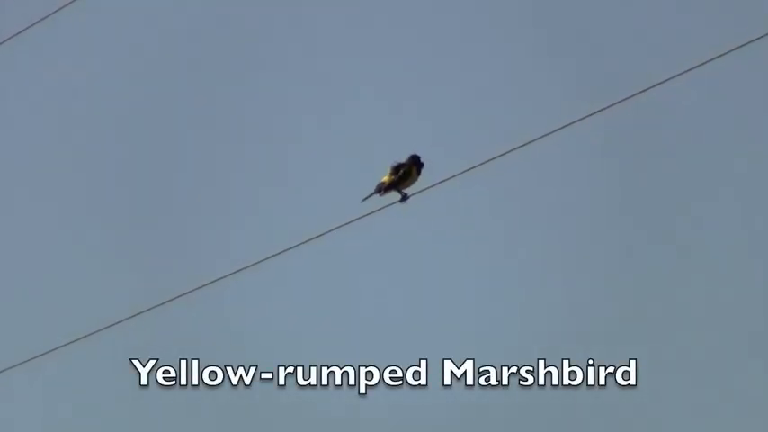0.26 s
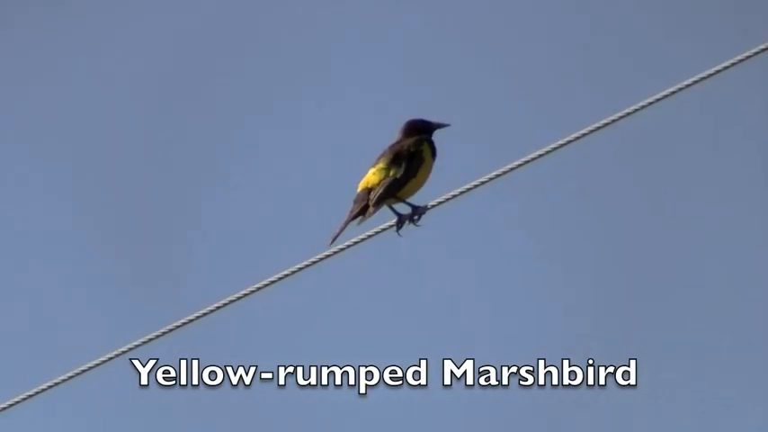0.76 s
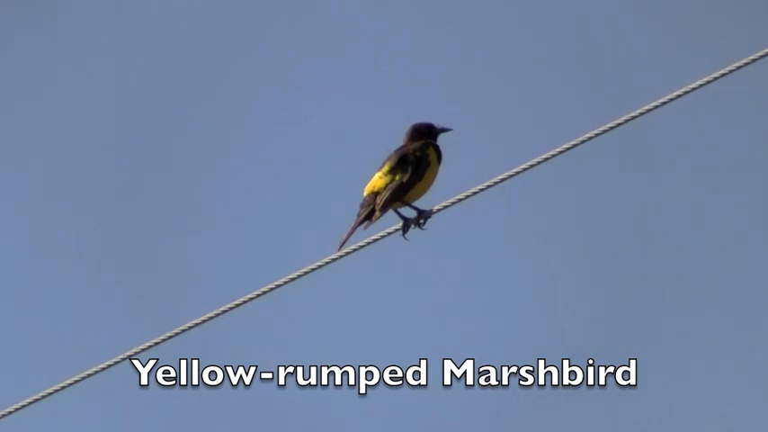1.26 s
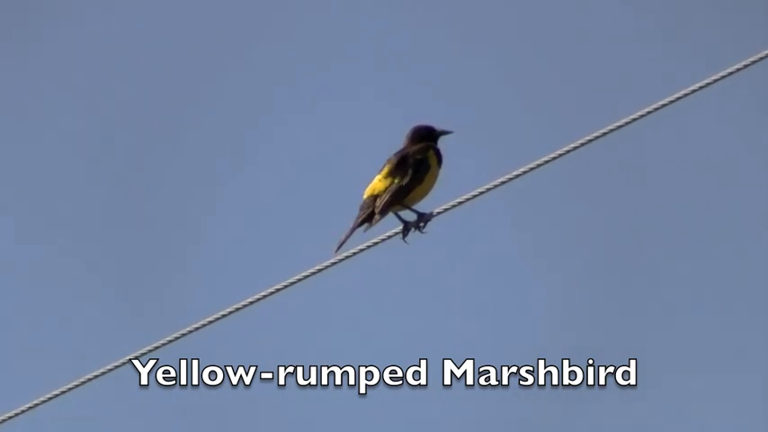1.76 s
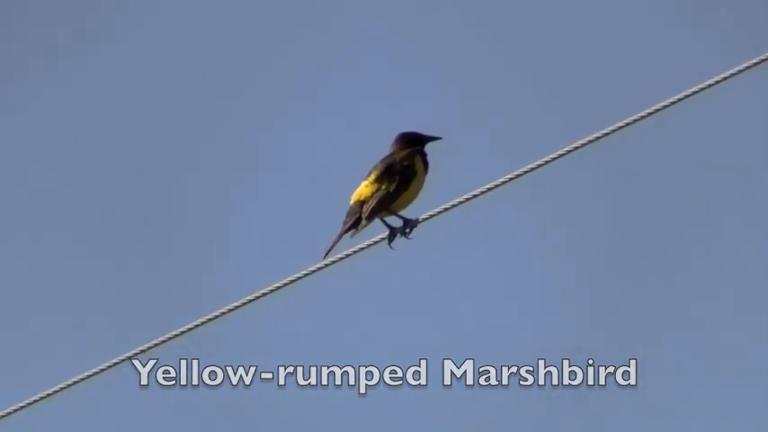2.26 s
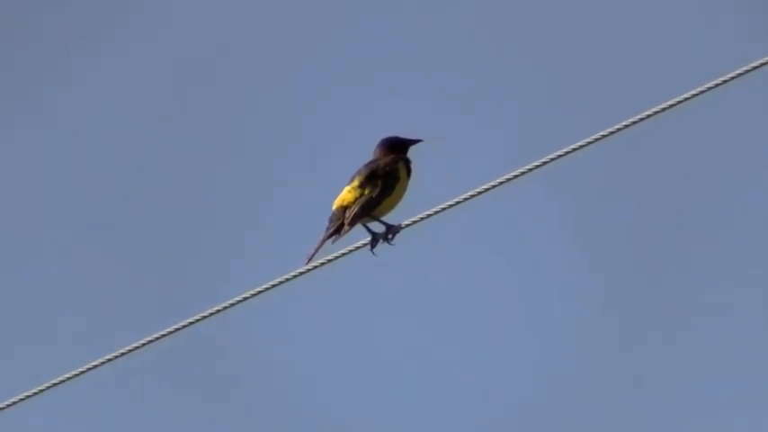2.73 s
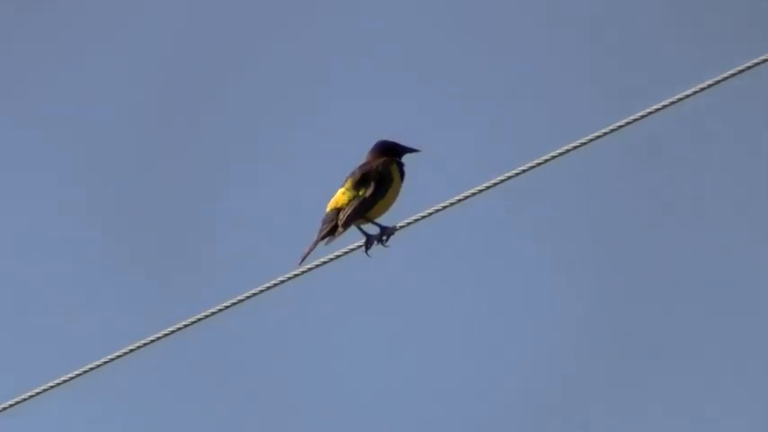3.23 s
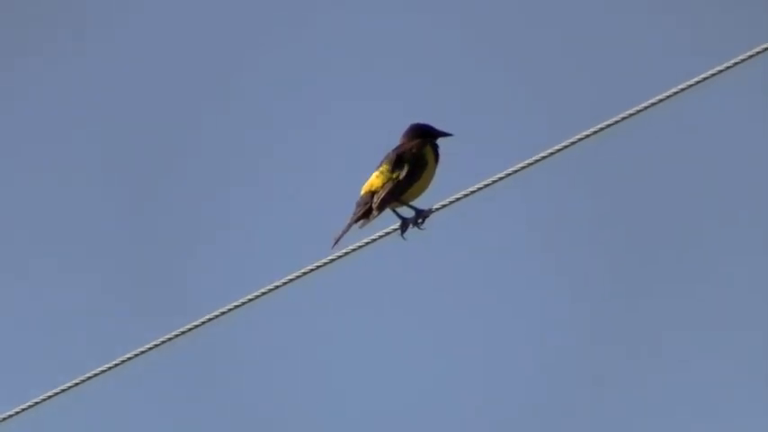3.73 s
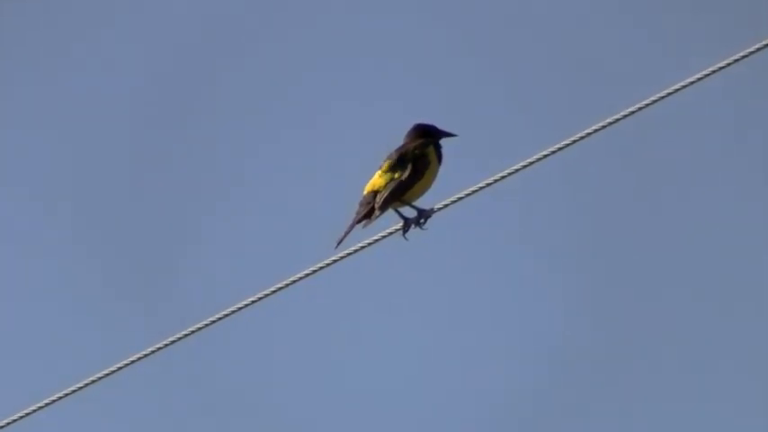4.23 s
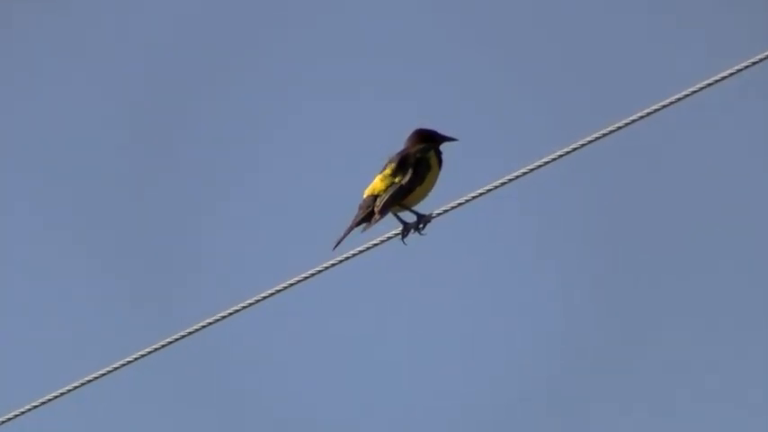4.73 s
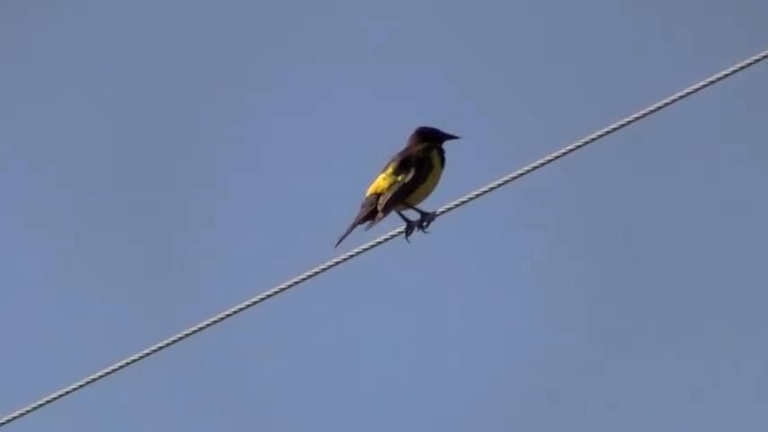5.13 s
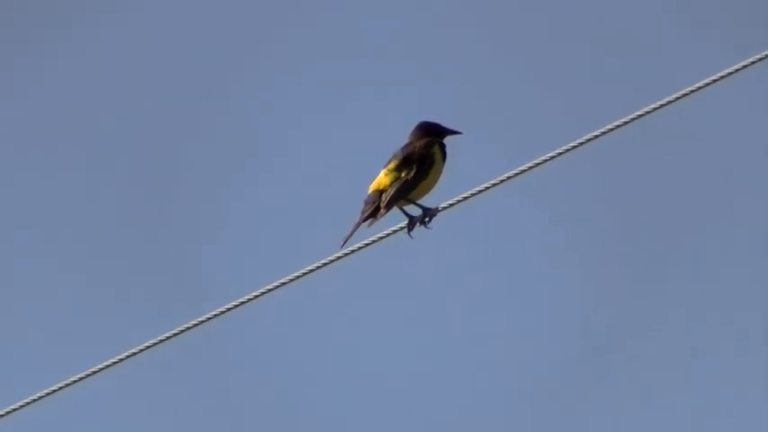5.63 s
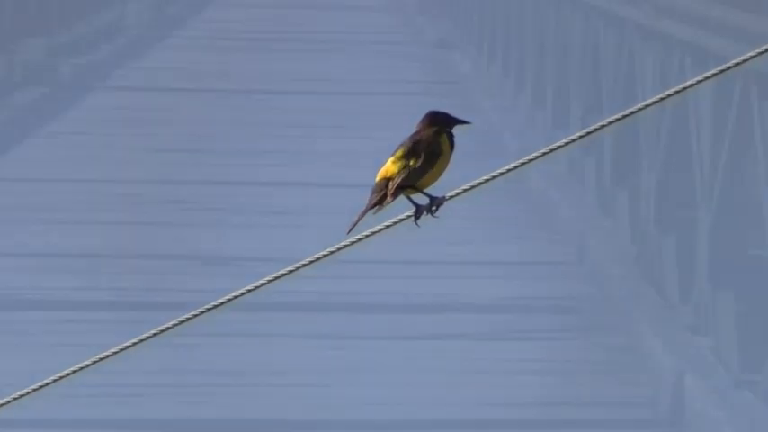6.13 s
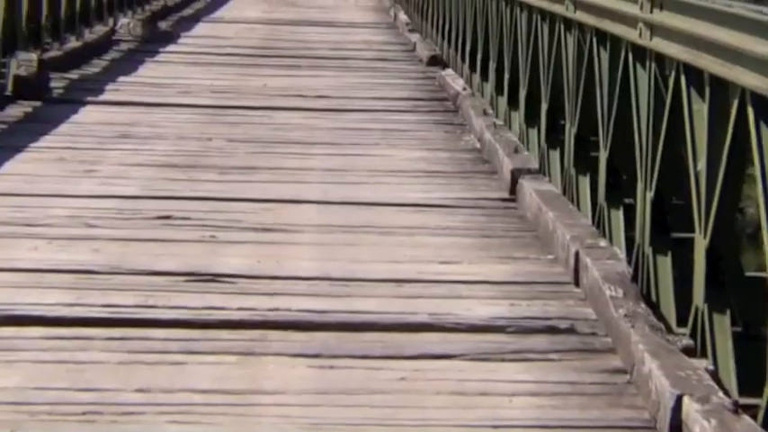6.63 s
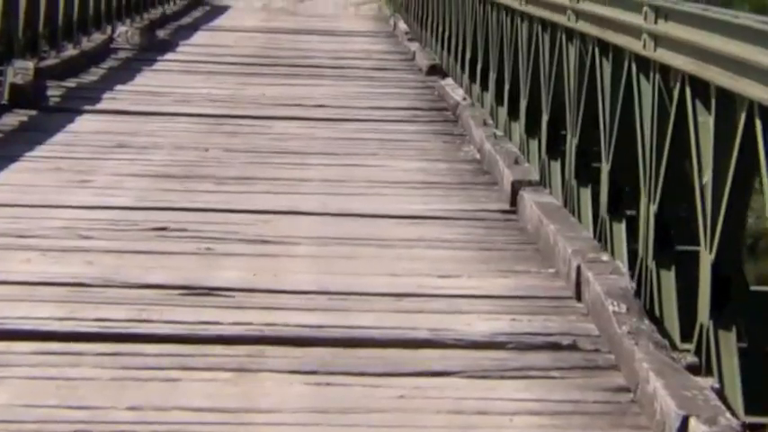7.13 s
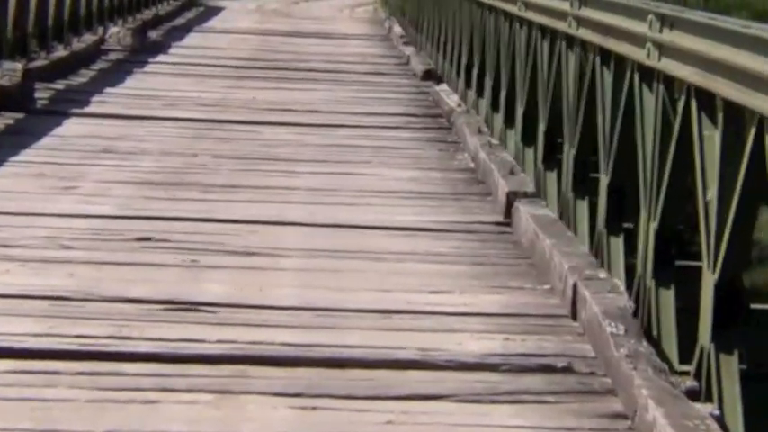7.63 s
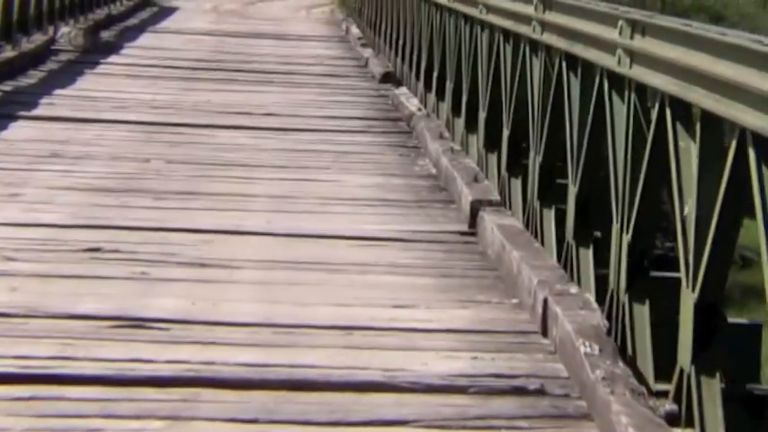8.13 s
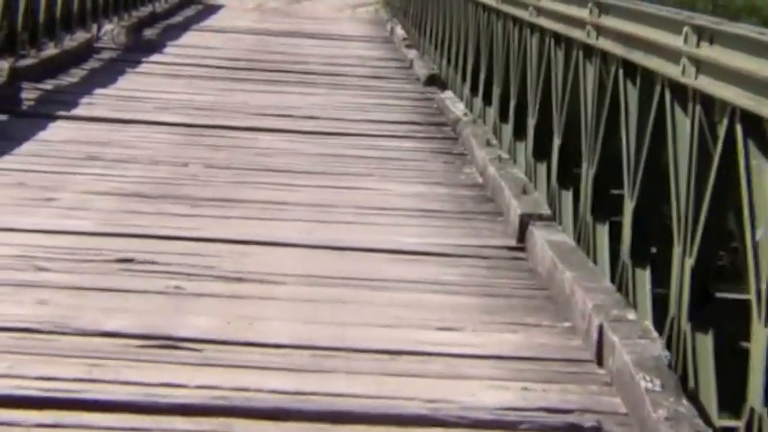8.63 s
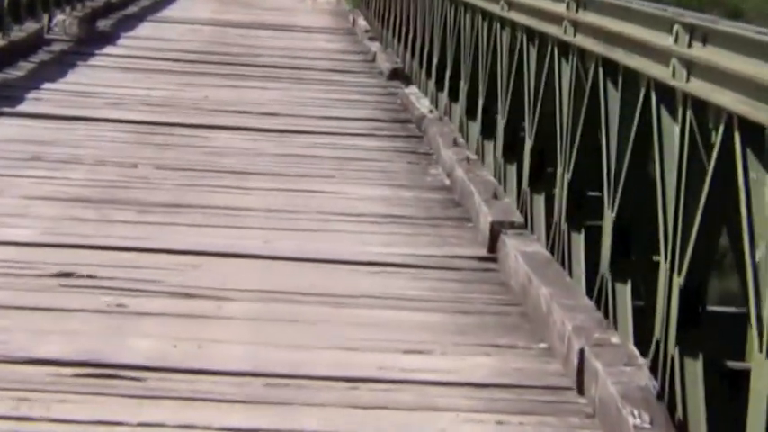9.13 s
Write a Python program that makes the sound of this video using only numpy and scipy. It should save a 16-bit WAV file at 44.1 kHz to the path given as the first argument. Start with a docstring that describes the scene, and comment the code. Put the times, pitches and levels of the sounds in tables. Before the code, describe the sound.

In a quiet marsh, small birds give short chirps and thin whistles over two crickets and a high insect buzz. A light breeze buffets the microphone, with a few soft rustles and dry ticks nearby. After about six seconds the sound switches to a much louder vehicle creeping over a plank bridge close by: the engine hums, the deck rumbles, loose boards knock ever more densely and steelwork rattles.

```python
"""A vehicle creeps over a plank bridge on a steel truss, close to the microphone: the engine hums, the
deck rumbles, loose boards knock under the tyres ever more densely, and the steelwork rattles.
It comes in at about six seconds, when the scene changes. Before that we are in a quiet marsh: small
birds call, two crickets and a katydid sing with their wings, something rustles close by, and a light
breeze buffets the microphone."""
import sys
import numpy as np
from scipy import signal
from scipy.fft import rfft, irfft, next_fast_len
from scipy.io import wavfile
from scipy.ndimage import map_coordinates

SR = 44100
rng = np.random.default_rng(int(sys.argv[2]) if len(sys.argv) > 2 else 0)


def log_audio(samples):
    """Write samples as a 16-bit WAV file to the path given in sys.argv[1]."""
    # one column per channel
    frames = np.atleast_2d(samples).T
    # limit to full scale, then quantise
    limited = np.clip(frames, -1, 1)
    pcm = np.round(limited * 32767).astype(np.int16)
    wavfile.write(sys.argv[1], SR, pcm)


N = 413216

# Modes of a board on its bearers. Each row: frequency in Hz, level in dB, t60 in seconds.
BOARD_MODES = [(202.4, -6, 0.12), (295.2, -1.5, 0.1), (358.5, -3, 0.062), (480.5, -1.5, 0.079),
               (645.7, -2.5, 0.076), (778, -2, 0.023), (1056, -1.5, 0.03), (1222, -8.5, 0.046),
               (1560, -24, 0.016), (2060, -16, 0.042), (2750, -17, .015), (3700, -21, .012)]
# Wheels dropping between boards. Each row: start in seconds, level in dB, pitch in Hz.
WHEEL_DROPS = [(6.372, -15, 95), (6.898, -24, 101), (7.178, -12.5, 75), (7.533, -10, 88), (7.745, -10, 62),
               (8.052, -8, 103), (8.117, -3, 63.6), (8.252, -18, 70), (8.684, -11.5, 107)]
# Fader on the marsh, with one brief dip early on. Each row: time in seconds, gain from 0 to 1.
MARSH_FADER = [(0, 0.84), (.58, 0.83), (.675, 0), (.77, 1), (6.19, 0.78), (6.35, 0)]


def bridge():
    """The vehicle draws nearer: engine, tyre noise and everything that it shakes."""
    # The approach. Each row: time in seconds, deck rumble and board clatter in dB before their trims.
    approach = [(6.5, -28, -30), (6.96, -31, -31), (8.1, -20, -25.5), (8.72, -23, -22),
                (9.02, -24.5, -12.5), (9.37, -29.5, -17.5)]
    # Spectrum of engine and tyre noise. Each row: frequency in Hz, relative level in dB.
    running_spectrum = [(76, -48), (130, 2), (198, -6.5), (268, -3.5), (297, -7), (393, -11), (651, -13),
                        (764, -13), (1050, -12.5), (1520, -17), (2010, -16), (2360, -22), (6200, -33.5),
                        (8390, -40.5), (16000, -97)]
    rumble_db, clatter_db = in_time(approach)
    rumble = deck_rumble(rumble_db + 2)
    running = from_db(-25 + 0.21 * drift(13)) * coloured(rng.standard_normal(N), running_spectrum)
    boards = from_db(clatter_db - 3) * board_clatter() + board_knocks()
    return engine() + running + rumble + boards + wheel_thumps() + steel_rattles()


def board_knocks(rebound_s=0.00458, settle_s=0.01, bounce_db=-9, deck_db=-13, deck_t60=0.3):
    """Each loose board cracks on its bearer, rebounds, settles and rings; the blow spreads in the deck."""
    # Boards struck by a tyre. Each row: start in seconds, level in dB, brightness in Hz, pitch ratio.
    loose_boards = [(7.4425, -8.5, 870, 1.06), (7.825, -13.5, 378, 0.76), (7.987, -16.5, 1500, 1.12),
                    (8.031, -12.5, 605, 0.89), (8.072, -11, 260, 0.73), (8.3485, -12, 750, 0.97),
                    (8.369, -13, 1200, 1.06), (8.415, -13, 990, 1.15), (8.759, -15, 400, 0.97),
                    (8.7892, -5, 1670, 1.015), (9.009, -13.5, 1100, 0.88), (9.054, -15, 500, 1),
                    (9.1014, -5.5, 1900, 0.87), (9.128, -10.5, 320, .9), (9.1573, -4, 3800, 1),
                    (9.284, -7, 383, 0.84), (9.346, -10.5, 600, 0.84)]
    out, t = np.zeros(N), np.arange(SR // 3) / SR
    for s, db, contact_hz, pitch in loose_boards:
        touches = 1. * (t == 0)
        add(touches, rebound_s * rng.uniform(0.72, 1.6), from_db([bounce_db]))
        add(touches, settle_s * rng.uniform(0.757, 1.6), from_db([bounce_db]))
        blow = low_pass(touches, contact_hz)
        uneven_db = rng.normal(0, 1.5, len(BOARD_MODES))
        # neighbouring modes move the surface in opposite directions
        board = sum((-1) ** k * from_db(level + uneven_db[k]) * ring(blow, hz * pitch, t60)
                    for k, (hz, level, t60) in enumerate(BOARD_MODES))
        deck = signal.fftconvolve(board, scatter(t, deck_t60))[:len(t)]
        # hard contacts also set the stiff grain of the wood snapping
        crack = ring(blow, hz=1700, t60=0.0045) + from_db(-3) * ring(blow, hz=3400, t60=0.0045)
        add(out, s, from_db(db) * (board + crack + from_db(deck_db) * deck))
    return out


def board_clatter(contact_hz=700):
    """Many lighter boards, long and short, chatter on their bearers."""
    out = 0
    for pitch in (.87, 1.0, 1.13):
        blows = low_pass(contacts(per_s=260, spread_db=1.5), contact_hz)
        out += sum((-1) ** k * from_db(db) * ring(blows, hz * pitch, t60)
                   for k, (hz, db, t60) in enumerate(BOARD_MODES))
    return rms_one(out)


def wheel_thumps(t60=0.14, tyre_hz=600):
    """A wheel drops, the tyre cushions it and the suspension booms for a few cycles."""
    out, t = np.zeros(N), np.arange(SR // 3) / SR
    for s, db, hz in WHEEL_DROPS:
        add(out, s, from_db(db) * np.sin(2 * np.pi * hz * t) * dying(t, t60))
    return low_pass(out, tyre_hz)


def deck_rumble(rolling_db, heave_db=-9, heave_t60=0.27):
    """The deck rumbles under the rolling wheels and heaves on after each drop."""
    # Spectrum of the deck. Each row: frequency in Hz, relative level in dB.
    deck_spectrum = [(12, -38), (20, -10), (49, 3), (69, 4), (102, 4), (204, -10), (270, -5), (330, -14.5),
                     (430, -15), (730, -120)]
    heave, t = np.zeros(N), np.arange(SR) / SR
    for s, db, _ in WHEEL_DROPS:
        add(heave, s, from_db(db + heave_db) * dying(t, heave_t60))
    rumble = coloured(contacts(per_s=260, spread_db=1.5), deck_spectrum)
    return np.hypot(from_db(rolling_db), heave) * rumble


def steel_rattles(rise_s=0.0028, truss_db=16, panels_db=-24):
    """Loose steel parts buzz against each other in short bursts that ring the truss and its panels."""
    # Shaken steelwork. Each row: start in seconds, level in dB, t60 in seconds, brightness in Hz.
    bursts = [(8.862, -20, 0.27, 8350), (8.922, -25, 0.54, 4450), (9.007, -24.5, 0.31, 7040),
              (9.174, -22.5, 0.18, 4050), (9.305, -25.5, 0.2, 6500), (9.322, -22.5, 0.37, 2620)]
    # Resonances of the truss. Each row: centre in Hz, width in Hz, relative level in dB.
    truss_bands = [(997, 204, 10), (1300, 500, 5), (1900, 510, -1.5), (2500, 320, -2), (3150, 520, -5.5),
                   (4640, 620, -8), (7800, 1140, -13.5)]
    # Modes of the steel panels. Each row: frequency in Hz, relative level in dB.
    panel_modes = [(1035, -2.5), (1110, 7), (1880, -7), (2499, -13), (2836, -4), (3311, -22), (4295, -27),
                   (4518, -16), (4830, -16), (5202, -13), (7700, -33), (8017, -30)]
    shaking, t = np.zeros(N), np.arange(SR // 2) / SR
    buzz = rms_one(contacts(per_s=2200, spread_db=1.5))
    for k, (s, db, t60, bright_hz) in enumerate(bursts):
        burst = buzz[k * len(t):(k + 1) * len(t)] * (1 - np.exp(-t / rise_s)) * dying(t, t60)
        add(shaking, s, from_db(db) * low_pass(burst, bright_hz))
    truss = sum((-1) ** k * from_db(db) * resonate(shaking, hz, width)
                for k, (hz, width, db) in enumerate(truss_bands))
    panels = sum((-1) ** k * from_db(db) * ring(shaking, hz, t60=.06)
                 for k, (hz, db) in enumerate(panel_modes))
    return from_db(truss_db) * truss + from_db(panels_db) * panels


def engine(wobble=0.0018, flutter=.17, firing_depth=0.19, firing_hz=44.4):
    """A slightly unsteady hum, and mechanical hiss that pulses with the firings."""
    # Tones of the hum. Each row: frequency in Hz, rms level in dB.
    hum_tones = [(113, -35), (176.5, -37), (225, -36), (269.3, -33), (357, -46), (642, -44), (807.7, -43.5),
                 (1077, -42.5)]
    # Ringing of the engine bay. Each row: centre in Hz, width in Hz, rms level in dB.
    bay_bands = [(1073, 33, -55.5), (2002, 75, -42.5), (2618, 21, -49), (4470, 540, -49), (7800, 590, -54),
                 (8430, 130, -57.5), (9720, 130, -59.5), (13000, 300, -83)]
    engine_time = np.cumsum(1 + wobble * drift(9)) / SR
    hum = 0
    for hz, db in hum_tones:
        height = np.sqrt(2) * from_db(db) * (1 + flutter * drift(16))
        hum += height * np.sin(2 * np.pi * (hz * engine_time + rng.random()))
    hiss = rng.standard_normal(N) * (1 + firing_depth * np.cos(2 * np.pi * firing_hz * engine_time))
    return hum + sum(from_db(db) * rms_one(resonate(hiss, hz, width)) for hz, width, db in bay_bands)


def marsh():
    """Birds, insects and close rustles over a bed of moving and still air."""
    return breeze() + still_air() + birds() + crickets() + katydid() + rustles()


def birds(echo_db=-5, echo_t60=0.36, leaf_hz=6500, rasp=0.012):
    """Each note is a slightly raspy tone on a curved glide; the reeds scatter the high notes most."""
    out, unsteady = np.zeros(N), 1 + rasp * drift(900)
    for s, length, glide, db in bird_notes():
        progress = np.linspace(0, 1, int(length * SR))
        hz = np.polyval(np.polyfit([0, .5, 1], glide, 2), progress)
        hz *= unsteady[int(s * SR):][:len(hz)]
        envelope = np.abs(np.sin(np.pi * progress)) ** 0.59
        add(out, s, from_db(db) * envelope * np.sin(2 * np.pi * np.cumsum(hz) / SR))
    high_pass = signal.butter(1, leaf_hz, "high", fs=SR, output="sos")
    reeds = signal.sosfilt(high_pass, scatter(np.arange(SR // 2) / SR, echo_t60))
    return out + from_db(echo_db) * signal.fftconvolve(out, reeds)[:N]


def bird_notes(chup_s=.027, tsip_s=0.018, tsip_hz=(8050, 7300, 7450), arch=(.73, 1, 0.59),
               far_count=16, far_s=0.099, far_hz=(2400, 4200), far_db=-66):
    """Every note as start and length in seconds, glide (start, middle, end) in Hz and level in dB."""
    # Short hooked "chup" calls. Each row: start in seconds, top in Hz, end pitch over top, level in dB.
    chups = [(0.526, 2760, .66, -43.5), (1.129, 2830, .76, -49.5), (1.236, 3420, .52, -43.5),
             (1.443, 2980, 0.81, -55.5), (1.611, 3170, .93, -46.5), (2.321, 2800, .72, -48.5),
             (3.229, 3100, 0.94, -51.5), (3.645, 3130, 0.68, -59), (4.004, 2750, 0.89, -46),
             (5.381, 2970, 0.67, -48), (5.606, 2810, 0.77, -42), (6.03, 2660, .9, -55)]
    # Slurs that arch up and down. Each row: start and length in seconds, top in Hz, level in dB.
    slurs = [(2.344, .095, 3400, -57.5), (2.629, 0.075, 6820, -45.5), (4.436, 0.079, 6680, -48)]
    # Thin high "tsip" calls. Each row: start in seconds, level in dB.
    tsips = [(4.352, -52), (5.988, -52.5)]
    # Whistles and a far hoot. Each row: start and length in seconds, three glide pitches in Hz, dB.
    whistles = [(0.01, 0.059, 2620, 2820, 2780, -52), (0.049, 0.08, 2750, 2270, 1980, -53),
                (0.129, 0.14, 2330, 2480, 2490, -54.5), (.38, .135, 4630, 3920, 3600, -63),
                (3.451, 0.69, 445, 444.5, 426, -60.5)]
    # far birds slur at random times and pitches
    marsh_s = MARSH_FADER[-1][0]
    far_slurs = [(when * marsh_s, far_s, np.interp(height, [0, 1], far_hz), far_db)
                 for when, height in rng.random((far_count, 2))]
    return ([(s, chup_s, np.multiply(hz, (0.93, 1, end)), db) for s, hz, end, db in chups]
            + [(s, length, np.multiply(hz, arch), db) for s, length, hz, db in slurs + far_slurs]
            + [(s, tsip_s, tsip_hz, db) for s, db in tsips]
            + [(s, length, glide, db) for s, length, *glide, db in whistles])


def crickets():
    """Two crickets chirp, one high and one low."""
    # Their songs. Each row: time in seconds, chirp level in dB, share of the far chorus from 0 to 1.
    high_song = [(.65, -89, .6), (.76, -63.5, 0.8), (2.2, -63, 0.5), (2.6, -58, .4), (3.5, -59.5, 0.27),
                 (4.7, -55.5, 0.02), (6.2, -56.5, 0.24)]
    low_song = [(2.0, -88, .4), (2.6, -60, 0.37), (2.9, -53, 0.15), (3.5, -57, 0.22), (3.9, -54, .02),
                (4.9, -52.5, .02), (5.04, -59, .02), (5.09, -88, .02)]
    return (cricket(high_song, per_s=12.8, peak_s=4.70, hz=6806, sharpness=1.2, droop=0.007)
            + cricket(low_song, per_s=16.23, peak_s=4.595, hz=2730, sharpness=4.0, droop=0.071))


def cricket(song, per_s, peak_s, hz, sharpness, droop, waver=0.00494):
    """Near-pure chirps whose pitch sags as the wing slows, over a blurred chorus of farther crickets."""
    db, chorus = in_time(song)
    place_in_stroke = (per_s * (clock() - peak_s) + .5) % 1 - .5
    pitch = hz * (1 - droop * place_in_stroke + waver * drift(180))
    envelope = wing_strokes(per_s, peak_s) ** sharpness * from_db(2 * drift(11))
    near = envelope * np.sin(2 * np.pi * np.cumsum(pitch) / SR)
    far = rms_one(resonate(rng.standard_normal(N), hz, width=130, order=2)) / np.sqrt(2)
    return from_db(db) * ((1 - chorus) * near + chorus * far)


def katydid(ring_on=0.66, split_hz=9200):
    """A high buzz: the opening and the closing stroke ring different parts of the wing."""
    # Wing resonances. Each row: centre in Hz, width in Hz, level in dB before the swell.
    wing_bands = [(8560, 130, -69), (8930, 320, -65.5), (9430, 160, -67.5), (8720, 1500, -67.5)]
    # Swell of the song. Each row: time in seconds, gain in dB of the lower bands and of the highest.
    song_swell = [(0.45, -4.5, -5.18), (1.05, -0.5, -6), (1.8, -3.5, -4), (2.5, -3.5, 4), (4.25, 1.5, -0.5),
                  (5.35, -1.23, -2.17), (5.8, -0.41, 2)]
    lower_db, highest_db = in_time(song_swell)
    out, opening = 0, wing_strokes(per_s=50.6, peak_s=0)
    for k, (hz, width, db) in enumerate(wing_bands):
        stroke = 1 - opening if k % 2 else opening
        wing = rms_one(resonate(rng.standard_normal(N), hz, width, order=2) * (stroke + ring_on))
        swell_db = highest_db if hz > split_hz else lower_db
        out += from_db(db + swell_db + .8 * drift(1.73)) * wing
    return out


def wing_strokes(per_s, peak_s):
    """Regular wing strokes from 0 to 1, one of them peaking at peak_s."""
    return np.cos(np.pi * per_s * (clock() - peak_s)) ** 2


def rustles():
    """Soft swells of fine grains and a few dry ticks, near the microphone."""
    # Spectrum of the grains. Each row: frequency in Hz, relative level in dB.
    grain_spectrum = [(150, -1), (350, -5), (750, -2.5), (1500, -10.5), (3000, -8), (5500, -11),
                      (10000, -26), (15000, -36)]
    # Rustles. Each row: middle and length in seconds, level in dB, brightness in Hz.
    swells = [(0.937, 0.14, -53, 5000), (1.202, 0.061, -50.5, 7000), (1.31, 0.069, -51, 14000),
              (1.664, 0.08, -58, 14000), (1.975, 0.18, -57.5, 6000), (2.094, 0.084, -50, 1300),
              (2.627, 0.1, -57.5, 5000), (2.976, 0.27, -52, 3580)]
    # Ticks. Each row: start in seconds, peak in dB, centre in Hz, t60 in seconds.
    ticks = [(.980, -34, 2300, 0.057), (1.685, -35.5, 4940, 0.074), (2.162, -40, 4200, .035),
             (2.653, -40.5, 3500, .02), (2.806, -37, 3700, .025), (3.005, -40.5, 4500, .025),
             (5.092, -41.5, 4000, .03)]
    grains = coloured(contacts(per_s=5000, spread_db=3.5), grain_spectrum)
    out = sum(from_db(db) * swell(s, length) * low_pass(grains, hz) for s, length, db, hz in swells)
    t = np.arange(SR // 10) / SR
    for s, db, hz, t60 in ticks:
        tick = resonate(rng.standard_normal(len(t)) * dying(t, t60), hz, width=hz, order=2)
        add(out, s, from_db(db) * tick / np.abs(tick).max())
    return out


def breeze(gust_s=0.22, trim_db=4):
    """A light wind swells and dies down, and its gusts buffet the microphone."""
    # Strength of the wind. Each row: time in seconds, level in dB before gusts and trim.
    wind = [(.4, -58), (1.6, -57), (2.35, -52.5), (3.9, -55), (5.2, -56.5)]
    # Gusts. Each row: middle in seconds, rise in dB.
    gusts = [(.82, 5), (1.2, 2.5), (3.03, 6.5), (3.55, 2.5), (4.3, 4.5), (4.85, 3.5), (5.62, 3)]
    # Spectrum of wind on the microphone. Each row: frequency in Hz, relative level in dB.
    wind_spectrum = [(12, -53), (20, -10), (43, -3.5), (81, -2), (192, -8.5), (225, -11.5), (333, -15.5),
                     (430, -17.5), (663, -32), (2200, -54), (2860, -66), (4840, -120)]
    wind_db = in_time(wind)[0] + sum(db * swell(s, gust_s) for s, db in gusts)
    return from_db(wind_db + trim_db) * coloured(rng.standard_normal(N), wind_spectrum)


def still_air(level_db=-58.5):
    """The faint, steady hiss behind everything in the marsh."""
    # Spectrum of the hiss. Each row: frequency in Hz, relative level in dB.
    air_spectrum = [(500, 9), (2000, -0.5), (4000, -2.5), (7500, -7), (10500, -7.5), (16000, -8)]
    return from_db(level_db) * coloured(rng.standard_normal(N), air_spectrum)


def from_db(db):
    """Decibels to gain."""
    return 10 ** (np.asarray(db) / 20)


def rms_one(x):
    """Scale to unit rms."""
    return x / np.sqrt(np.mean(x ** 2) + 1e-20)


def clock():
    """Time of every sample in seconds."""
    return np.arange(N) / SR


def in_time(rows):
    """Each column of a curve, at every sample."""
    s, *columns = np.transpose(rows)
    return [np.interp(clock(), s, c) for c in columns]


def add(out, s, sound):
    """Mix a sound in at time s."""
    at = int(np.clip(round(s * SR), 0, N - 1))
    out[at:at + len(sound)] += sound[:N - at]


def drift(per_s):
    """A random wander with rms 1."""
    knots = rng.standard_normal(2000)
    return rms_one(map_coordinates(knots, [clock() * per_s], order=1, mode="wrap"))


def contacts(per_s, spread_db):
    """Random clicks of uneven size."""
    sizes = from_db(spread_db * np.minimum(rng.exponential(1, N), 3)) * rng.choice([-1, 1], N)
    return sizes * (rng.random(N) < per_s / SR)


def swell(s, length):
    """A smooth rise to 1 and fall around time s."""
    return np.exp(-2 * ((clock() - s) / length) ** 2)


def dying(t, t60):
    """Exponential decay, 60 dB down after t60 seconds."""
    return np.exp(-np.log(1000) * t / t60)


def scatter(t, t60):
    """A dying tail of dense reflections with unit energy."""
    tail = rng.standard_normal(len(t)) * dying(t, t60)
    return tail / np.linalg.norm(tail)


def coloured(x, spectrum):
    """Give a steady sound a spectrum with falling ends; rms 1."""
    hz, db = np.transpose(spectrum)
    size = next_fast_len(N)
    f = np.maximum(np.arange(size // 2 + 1) * SR / size, 1)
    ends = np.minimum(f / hz[0], 1) ** 2 * np.minimum(hz[-1] / f, 1) ** 2
    gain = ends * from_db(np.interp(np.log(f), np.log(hz), db))
    return rms_one(irfft(rfft(x, size) * gain, size)[:N])


def low_pass(x, hz):
    """Two-pole low-pass."""
    return signal.sosfilt(signal.butter(2, min(hz, SR / 2 - 2000), fs=SR, output="sos"), x)


def resonate(x, hz, width, order=1):
    """A resonance of the given width in Hz, gain 1 on top."""
    edges = np.clip([hz - width / 2, hz + width / 2], 10, SR / 2 - 100)
    return signal.sosfilt(signal.butter(order, edges, "band", fs=SR, output="sos"), x + 1e-18)


def ring(clicks, hz, t60):
    """A unit click sets a sine of height 1 ringing."""
    r, w = np.exp(-np.log(1000) / (t60 * SR)), 2 * np.pi * hz / SR
    return signal.lfilter([0, np.sin(w)], [1, -2 * r * np.cos(w), r * r], clicks + 1e-18)


def scene():
    """The marsh, then the bridge, in mono."""
    # Fader on the bridge. Each row: time in seconds, gain from 0 to 1.
    bridge_fader = [(6.175, 0.0049), (6.36, 0.96)]
    return (in_time(MARSH_FADER)[0] * marsh() + in_time(bridge_fader)[0] * bridge())[None]


def record(dry):
    """The hardest knocks overload softly; the top of the treble is cut."""
    ceiling, cutoff_hz = .95, 15900
    clipped = dry / (1 + (dry / ceiling) ** 16) ** (1 / 16)
    return signal.sosfilt(signal.ellip(10, .1, 80, cutoff_hz, fs=SR, output="sos"), clipped)


dry = scene()
out = record(dry)
log_audio(out)
```